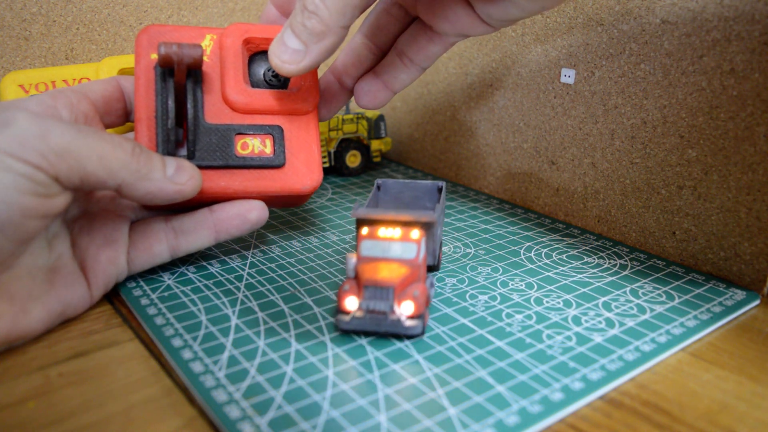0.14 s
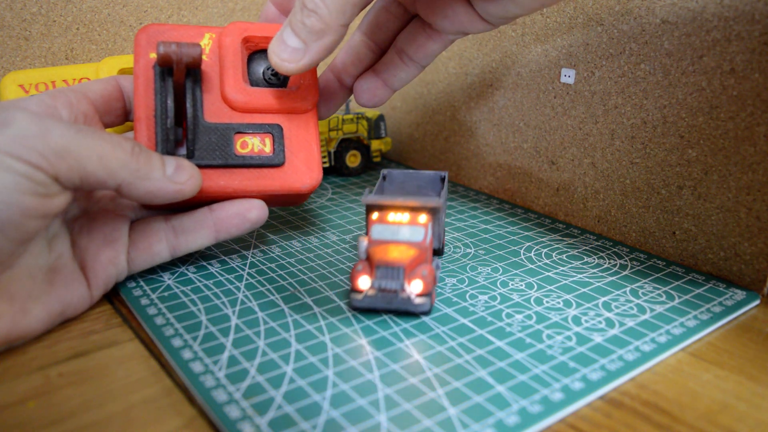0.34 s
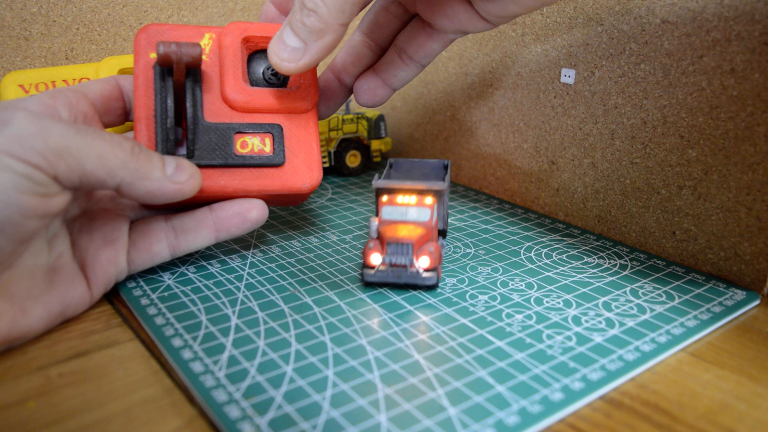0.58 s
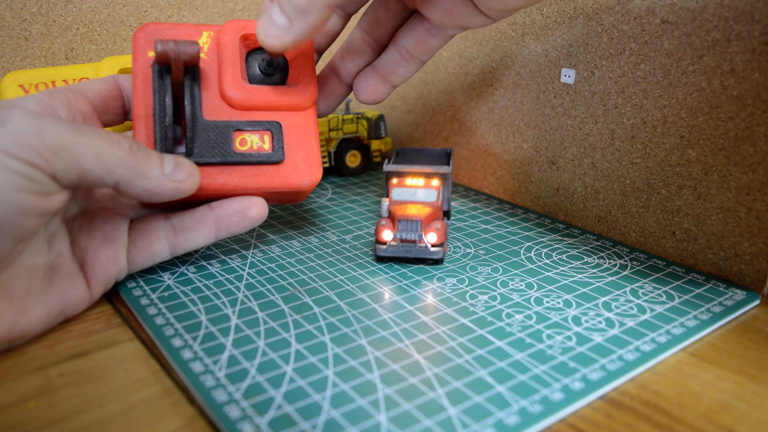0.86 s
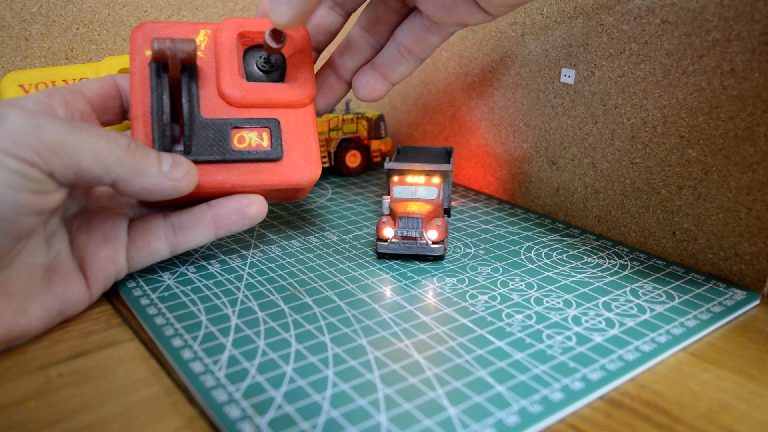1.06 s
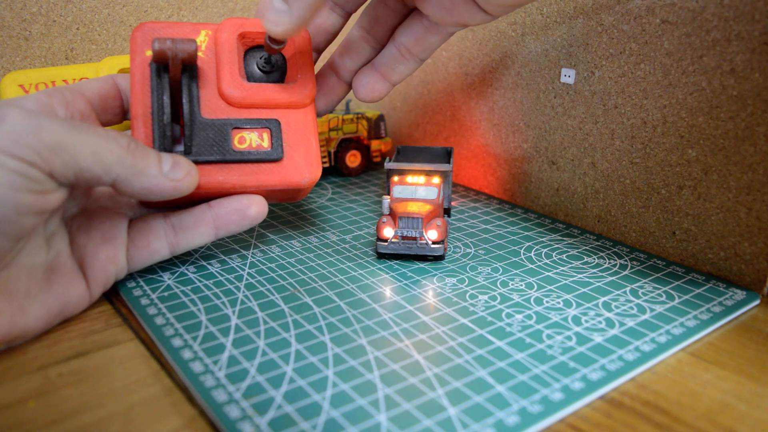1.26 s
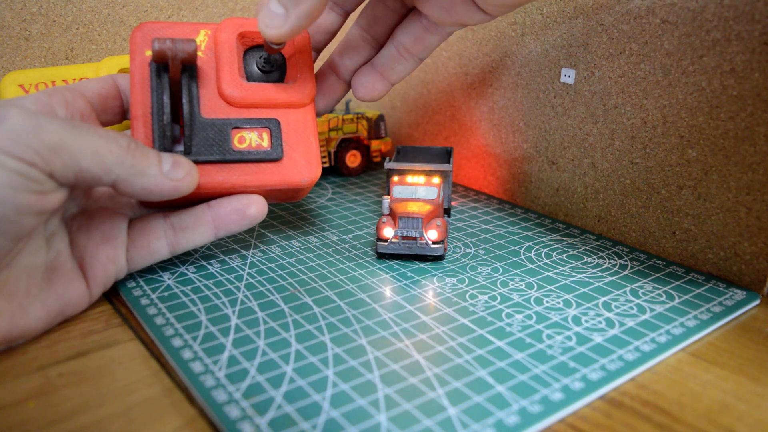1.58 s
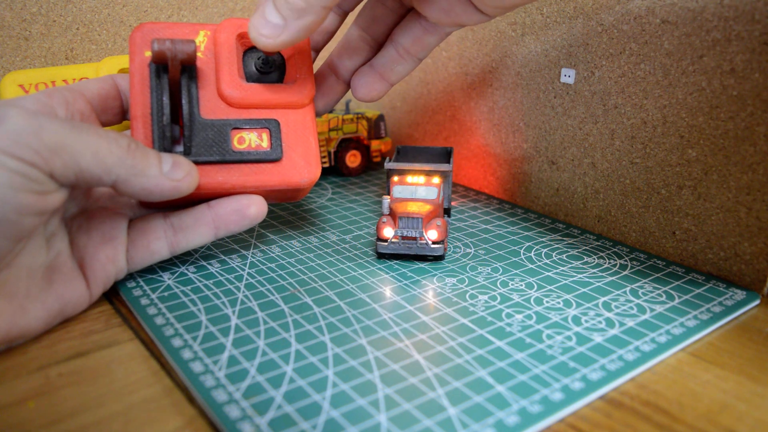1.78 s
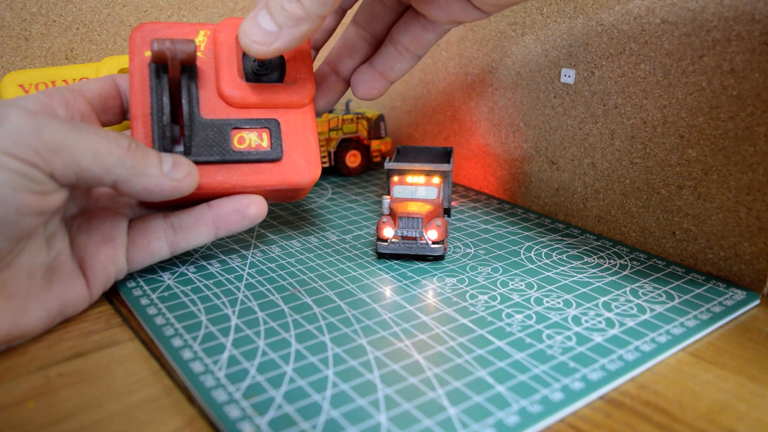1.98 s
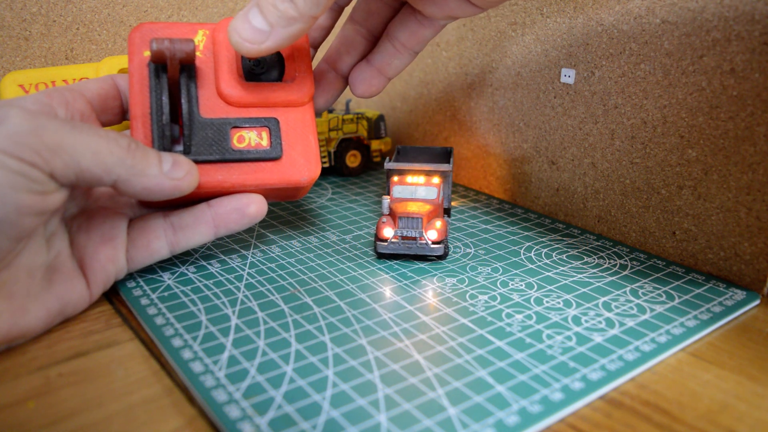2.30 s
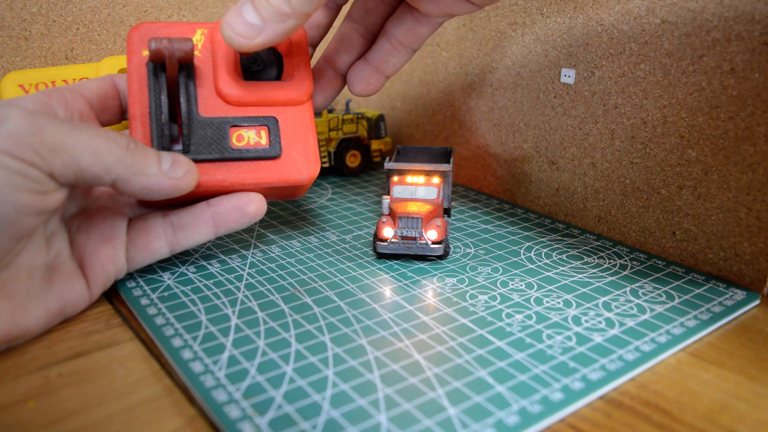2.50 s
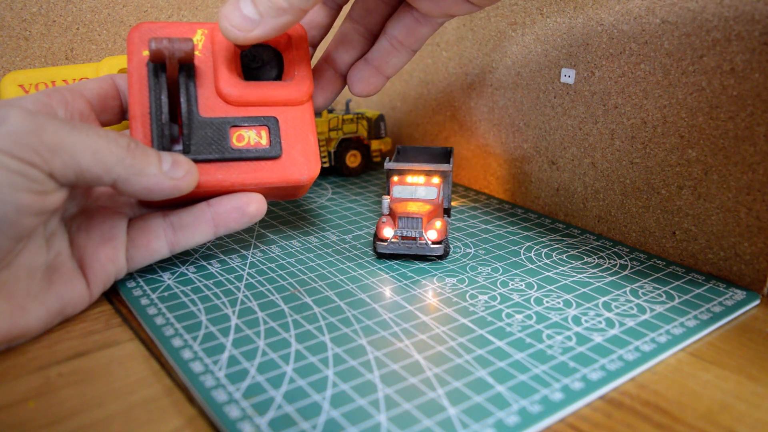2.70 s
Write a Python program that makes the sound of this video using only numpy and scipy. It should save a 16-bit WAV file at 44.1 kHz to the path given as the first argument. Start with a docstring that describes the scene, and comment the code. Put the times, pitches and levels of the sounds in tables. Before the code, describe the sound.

A tiny toy truck's motor and gears whirr, bright and hissy, surging unevenly with rattles and sharp ticks, slowing to a stop around 0.85-1 s. A finger faintly rubs a hollow plastic remote until 1.4 s, with soft low bumps to 1.5 s. A very faint high whistle glides by near 1.95 s. Rough gear buzzes burst at 2.1-2.45 s. Low, wavering fan hum and air continue throughout a small room.

```python
"""A small room with a fan humming throughout, one microphone: a miniature toy truck backs across a cutting mat.
Its tiny motor and gear teeth whirr, rattle and tick as they run down: uneven clicks and hiss through resonances.
A finger rubs the plastic remote, fine-grained clicks through a hollow case, and the hands bump softly.
A thin high whistle, a gliding sine, passes by; then the truck's small gears buzz in short, surging bursts.
The truck has a short, weak room tail; the hands sound dry; the fan is steady hum lines, a throb and moving air."""
import sys
import numpy as np
from scipy import signal
from scipy.fft import rfft, irfft, next_fast_len
from scipy.io import wavfile
from scipy.ndimage import map_coordinates

SR = 44100
rng = np.random.default_rng(int(sys.argv[2]) if len(sys.argv) > 2 else 0)


def persist_wave(psi):
    """Save psi, clipped to +-1, as 16-bit WAV."""
    counts = np.round(np.clip(psi, -1, 1) * 32767).astype(np.int16)
    wavfile.write(sys.argv[1], SR, np.atleast_2d(counts).T)


N = 125685
T = np.arange(N) / SR  # time of each sample, s

# In every COLOUR table the levels give a shape only: the filter is scaled to unit power.
# In every MODES table the width is taken at half the lift.

# Speed of the motor shaft: [t/s, rate/turns per s]
SHAFT_SPEED = [(0, 156), (.2, 158), (.3, 195), (.42, 207), (.5, 220), (.6, 180), (.68, 190), (.8, 224),
               (.86, 157), (.98, 70)]
# Level of the drive gears: [t/s, level/dB]
DRIVE_LEVEL = [(0, -50), (.11, -46.5), (.25, -47), (.36, -44), (.47, -43), (.55, -46.5), (.64, -46.5),
               (.75, -46.5), (.81, -45.5), (.87, -50), (.95, -57), (1.0, -68)]
# Swing of the load within a shaft turn: [multiple of the shaft rate, depth/dB before MESH_DEPTH]
MESH_SWINGS = [(1, 3), (2, 1.4), (3, 1.2), (4, 1.8), (5, 1.7), (10, 1.2)]
MESH_DEPTH, DRIVE_WAVER_DB = 0.77, 1.8  # factor on the swings; random waver of the load
# Scatter of the drive teeth in time and size; share of clicks in the power, the rest is hiss
TOOTH_JITTER_S, TOOTH_SCATTER_DB, TOOTH_SHARE = 0.00018, -1.5, 0.29
# Colour of the drive gears: [f/Hz, level/dB]
GEAR_COLOUR = [(1500, -37), (2400, -12), (3000, -7.5), (3700, -10), (4050, -8), (4400, -15), (5100, -5),
               (6000, -4), (7000, -4), (8500, -0.5), (9600, -3), (11000, -7.5), (12000, -12), (13000, -15),
               (15500, -27)]
# Resonances of the drive gears: [f/Hz, width/Hz, lift/dB]
GEAR_MODES = [(5940, 200, 1.5), (7850, 100, 7), (9500, 160, 7.5), (10100, 120, 3.5), (11750, 400, 4)]

# Level of the gearbox ringing at 6-8 kHz: [t/s, level/dB]
GEARBOX_LEVEL = [(0, -50), (.1, -63), (.17, -46.5), (.27, -51), (.35, -45.5), (.45, -46), (.53, -64),
                 (.64, -52), (.78, -51.5), (.86, -56)]
# Colour of the gearbox: [f/Hz, level/dB]
GEARBOX_COLOUR = [(4500, -37), (5300, -10), (6200, 0), (7000, 4), (7900, -5.5), (8600, -20), (11000, -39)]
# Resonances of the gearbox: [f/Hz, width/Hz, lift/dB]
GEARBOX_MODES = [(6070, 130, 13.5), (6430, 120, 13), (6870, 110, 13.5), (7100, 120, 12), (7550, 200, -11),
                 (7860, 130, -3)]
# Ring of the truck's shell: [t/s, f/Hz, level/dB]
SHELL_RING = [(0, 2940, -56), (.1, 2930, -53.5), (.22, 2980, -51.5), (.35, 2932, -62.5), (.5, 3122, -56.5),
              (.65, 3184, -60), (.75, 3250, -54), (.86, 3250, -84)]
SHELL_WIDTH_HZ = 175  # offset from the centre where the ring is down to half amplitude
# Colour of the wheels on the mat: [f/Hz, level/dB]
WHEEL_COLOUR = [(60, -14), (85, 3), (115, -9), (150, -14), (400, -33), (2000, -46)]
WHEEL_DB = -14.5  # against the gears

# Sharp rings of the gearbox: [f/Hz, width/Hz at half amplitude, level/dB against GEARBOX_LEVEL]
SHARP_RINGS = [(2890, 41, -14), (6760, 53, -17), (7760, 18, -8)]
# Faint top whine as the motor speeds up again: [t/s, f/Hz, level/dB]
TOP_WHINE = [(.66, 13500, -74), (.73, 13800, -63), (.8, 14250, -62), (.87, 14570, -70)]

# Gears catching and rattling: [t/s, length/s, level/dB]
RATTLES = [(.482, 0.01, -39.5), (0.548, 0.0044, -44), (0.574, 0.0048, -44), (0.673, 0.0065, -38),
           (.697, 0.01, -42.5), (0.717, 0.023, -41.5), (0.748, 0.0093, -38.5), (0.928, 0.019, -47.5)]
# Colour of the rattles: [f/Hz, level/dB]
RATTLE_COLOUR = [(1180, -52), (2000, -13), (3290, 0), (4480, -3.5), (5890, 4), (9110, 1), (10400, -1.5),
                 (11300, -10), (14000, -12), (15500, -19)]
# Backlash ticks, most of them as the gears run down: [t/s, level/dB]
BACKLASH_TICKS = [(.018, -39.5), (0.055, -35.5), (0.216, -34), (.444, -33), (.829, -35), (.835, -43),
                  (0.839, -36.5), (0.845, -33.5), (.852, -32.5), (0.8814, -38), (0.907, -38), (0.941, -43),
                  (.9745, -48)]
TICK_T60_S = 0.011
# Colour of the ticks: [f/Hz, level/dB]
TICK_COLOUR = [(2000, -21), (4500, -19), (6500, -9), (9300, 0), (11200, -3), (12500, -23), (15500, -24)]

# Gear buzzes: [t/s, length/s, level/dB, rate/surges per s]
BUZZES = [(2.094, 0.071, -34.5, 67), (2.176, 0.037, -33.5, 59), (2.215, 0.093, -34, 54.5),
          (2.375, 0.057, -35, 27)]
BUZZ_ATTACK_S, BUZZ_RELEASE_S = 0.0064, 0.023
BUZZ_SURGE_DB, SURGE_DELAY_S = 2.4, 0.0084  # swing either way; first crest after the start
BUZZ_TEETH_PER_S, BUZZ_CLICK_SHARE = 1100, 0.45
BUZZ_JITTER_S, BUZZ_SCATTER_DB = 0.00025, 1.5
# Colour of the buzzes: [f/Hz, level/dB]
BUZZ_COLOUR = [(1800, -42), (2400, -20.5), (2900, -9.5), (3600, -9.5), (4600, -19.5), (5500, -10),
               (6300, -12.5), (7000, -3), (7700, -5.5), (8800, -5), (9800, -1), (11400, -0.5),
               (12400, -14.5), (15500, -19)]
# Resonances in the buzzes: [f/Hz, width/Hz, lift/dB]
BUZZ_MODES = [(4135, 380, 11.5), (6850, 380, 5.5), (7550, 300, -4), (8220, 300, 6), (8600, 280, -1),
              (9240, 140, 4.5), (10300, 170, 0), (10860, 460, -4), (11040, 300, 7), (11700, 130, 1)]

# Finger sliding on plastic: [t/s, level/dB]
RUB_LEVEL = [(.93, -55), (1.02, -58.5), (1.08, -49.5), (1.15, -53), (1.22, -52), (1.32, -57), (1.38, -65)]
# Colour of the rub: [f/Hz, level/dB]
RUB_COLOUR = [(1470, -37), (2500, -10), (3750, -11), (4320, -2.5), (4800, -9.5), (5370, -2.5), (5790, -7),
              (6330, -6), (9490, 0), (12400, -16), (15000, -22)]
# Colour of the hollow remote: [f/Hz, level/dB]
CASE_COLOUR = [(120, -1.5), (300, -31), (400, -11), (480, 1.5), (560, -16), (1500, -28), (5000, -52)]
CASE_DB = -2  # against the rub
# Soft bumps of the hands: [t/s, f/Hz, level/dB, t60/s]
HAND_BUMPS = [(1.04, 70, -41.5, 0.1), (1.14, 42.4, -50, 0.3), (1.28, 91, -53, .2), (1.52, 34, -50.5, 0.14),
              (1.529, 75, -51, .12)]

# Low drone while the truck rolls: [t/s, level/dB]
DRONE_LEVEL = [(0, -61.5), (.1, -54), (.18, -84), (.28, -54), (.44, -53.5), (.52, -72), (.64, -56.5),
               (.8, -49), (.92, -56.5), (1.0, -69)]
DRONE_HZ = 109.3
# Thin whistle: [t/s, f/Hz, level/dB]
WHISTLE = [(1.7, 11400, -78), (1.77, 11850, -76), (1.83, 11400, -78), (1.88, 12200, -66),
           (1.92, 12680, -61), (1.965, 12800, -57), (2.0, 12250, -68), (2.04, 11200, -67),
           (2.09, 10900, -78)]

# Hum lines of the fan: [f/Hz, level/dB before waver and swell]
HUM_LINES = [(109, -72), (251.8, -57), (293.6, -51.5), (327, -63), (839.5, -70), (974, -67), (1174, -74.5),
             (2433, -75)]
HUM_WAVER_DB, HUM_DRIFT_RAD = 1.36, 0.52  # scale of the random level and phase curves
# Slow swell of all hum lines: [t/s, level change/dB]
HUM_SWELL = [(0, -2.5), (.2, -0.5), (.38, 1), (.65, -.5), (1.0, -2), (1.3, 0.5), (1.65, -1.5), (1.8, 1),
             (2.0, 2.5), (2.25, 0), (2.42, -0.5), (2.7, 2.5), (2.85, 0)]
# Level of the deepest hum, which wavers: [t/s, level/dB]
THROB_LEVEL = [(0, -57.5), (.42, -52), (.52, -69), (.72, -51), (.82, -68), (1.1, -60), (1.28, -56),
               (1.37, -47), (1.46, -50), (1.55, -63), (1.63, -49), (1.7, -65), (1.77, -49.5), (1.88, -56),
               (1.93, -66), (2.01, -52), (2.4, -57), (2.47, -59), (2.53, -59), (2.68, -50.5), (2.85, -55)]
THROB_HZ = 48.4
# Level of the fan's air: [t/s, level/dB]
AIR_LEVEL = [(0, -50.5), (.9, -50.5), (1.25, -50.5), (1.6, -51), (1.8, -50), (2.35, -50), (2.55, -51),
             (2.85, -51)]
# Colour of the fan's air: [f/Hz, level/dB]
AIR_COLOUR = [(20, -12), (45, -1), (75, -8.5), (110, -5), (150, -15), (200, -1.5), (270, 1), (370, -2.5),
              (480, -4), (720, -6), (980, -7.5), (1500, -10.5), (2500, -16), (4500, -20.5), (9200, -24),
              (11500, -24), (15500, -26.5)]
# Resonances in the air: [f/Hz, width/Hz, lift/dB]
AIR_MODES = [(185.3, 14, 2), (337, 4.8, -0.5), (373, 10.5, 5.5), (582, 34, -8), (760, 29, -6),
             (930, 38, 2.5), (10100, 550, 5.5)]

ROOM_T60_S, ROOM_DB = 0.21, -14  # decay of the tail; its level against the direct sound
TOP_HZ = 15800  # upper band limit


def amp(db):
    """Decibels to gain."""
    return 10 ** (np.asarray(db) / 20)


def unit(x):
    """Scale to rms 1."""
    return x / np.sqrt(np.mean(x ** 2) + 1e-20)


def noise():
    """White noise."""
    return rng.standard_normal(N)


def wobble(rate):
    """A smooth random curve, rate knots a second."""
    return map_coordinates(rng.standard_normal(4000), [T * rate + 2], mode="wrap")


def level(rows):
    """Gain from rows that start with t/s and end with level/dB; it fades outside the first and last row."""
    rows = np.array(rows)
    outside = np.maximum(rows[0, 0] - T, 0) + np.maximum(T - rows[-1, 0], 0)
    return amp(np.interp(T, rows[:, 0], rows[:, -1])) * np.exp(-outside / 0.022)


def turns(rows):
    """Cycles completed under a curve of t/s and f/Hz."""
    rows = np.array(rows)
    return np.cumsum(np.interp(T, rows[:, 0], rows[:, 1])) / SR


def sine(cycles, phase=0):
    """Sine of rms 1 with a wandering phase in radians."""
    return unit(np.sin(2 * np.pi * cycles + phase))


def filtered(x, response):
    """x times a response of frequency."""
    size = next_fast_len(N + 8192)  # zero padding keeps the end from wrapping to the start
    return irfft(rfft(x, size) * response(np.fft.rfftfreq(size, 1 / SR)), size)[:N]


def colour(x, points, modes=()):
    """Causal filter of unit power through f/Hz, level/dB points, lifted at each mode."""
    size = 8192
    f = np.fft.rfftfreq(size, 1 / SR)
    hz, db = np.transpose(points)
    shape = np.interp(np.log(f + 1), np.log(hz), db)
    shape = shape + 40 * np.log10(np.minimum((f + 1) / hz[0], 1))  # 12 dB/octave below the first point
    shape = shape + sum(lift / (1 + (2 * (f - c) / w) ** 2) for c, w, lift in modes)
    # folding the cepstrum gives minimum phase
    cepstrum = irfft(np.log(amp(shape) + 1e-6))
    cepstrum[1:size // 2] *= 2
    cepstrum[size // 2 + 1:] = 0
    impulse = irfft(np.exp(rfft(cepstrum)))
    return signal.fftconvolve(x, impulse / np.linalg.norm(impulse))[:N]


def teeth(cycles, jitter_s, scatter_db, share):
    """One click per cycle, uneven in time and size, mixed with sliding hiss; share is the clicks' power."""
    at = np.interp(np.arange(1, cycles[-1]), cycles, T)
    chance = rng.standard_normal((20000, 2))[:len(at)]
    at = (at + jitter_s * chance[:, 0]) * SR
    # windowed sinc pulses place each click between samples
    taps = np.floor(at)[:, None] + np.arange(-7, 9)
    offset = taps - at[:, None]
    clicks = np.sinc(offset) * np.cos(np.pi * offset / 16) ** 2
    clicks = clicks * amp(scatter_db * chance[:, 1:])
    index = np.clip(taps, 0, N - 1).astype(int)
    train = np.bincount(index.ravel(), clicks.ravel(), N)
    even = unit(train / np.sqrt(np.gradient(cycles)))  # equal power at any click rate
    share = np.clip(share, 0, 1)
    return np.sqrt(share) * even + np.sqrt(1 - share) * noise()


def gate(start, length, attack_s, release_s):
    """Rise, hold, then fall 60 dB over the release; attack lies within the length."""
    rise = np.clip((T - start) / attack_s, 0, 1)
    return rise * amp(-60 * np.maximum(T - start - length, 0) / release_s)


def drive(count=5):
    """Pinion teeth click count times a turn, swelling with the mesh; gearbox and shell ring, the wheels rumble."""
    shaft = turns(SHAFT_SPEED)
    swing_db = MESH_DEPTH * sum(db * np.cos(2 * np.pi * k * shaft) for k, db in MESH_SWINGS)
    load = unit(amp(swing_db + DRIVE_WAVER_DB * wobble(59.65)))
    contact = unit(load * teeth(count * shaft, TOOTH_JITTER_S, TOOTH_SCATTER_DB, TOOTH_SHARE))
    gears = colour(contact * level(DRIVE_LEVEL), GEAR_COLOUR, GEAR_MODES)
    gearbox = colour(load * noise() * level(GEARBOX_LEVEL), GEARBOX_COLOUR, GEARBOX_MODES)
    # slow noise shifted up to the gliding shell frequency
    ring = unit(filtered(noise(), lambda f: 1 / (1 + (f / SHELL_WIDTH_HZ) ** 2)))
    shell = unit(ring * np.cos(2 * np.pi * turns(SHELL_RING) + wobble(120)))
    wheels = amp(WHEEL_DB) * colour(noise(), WHEEL_COLOUR)
    return gears + gearbox + shell * level(SHELL_RING) + wheels * level(DRIVE_LEVEL)


def singing():
    """A few lightly damped parts of the gearbox keep ringing while it runs; a fuzzy whine rises on top."""
    def narrow(hz, width):
        return unit(filtered(noise(), lambda f: 1 / (1 + (2 * (f - hz) / width) ** 2)))

    fuzz = wobble(900) * np.cos(2 * np.pi * turns(TOP_WHINE) + wobble(500))
    whine = level(TOP_WHINE) * unit(fuzz)
    rings = sum(amp(db) * narrow(hz, width) for hz, width, db in SHARP_RINGS)
    return whine + level(GEARBOX_LEVEL) * rings


def rattles():
    """The gears catch for a few milliseconds as bursts of clicks, and tick across their backlash."""
    catch = sum(amp(db) * gate(s, length, 0.00069, 0.018) for s, length, db in RATTLES)
    chatter = catch * teeth(1500 * T, 0.000273, 2.7, 0.36)
    ticks = sum(amp(db) * gate(s, 0.0008, 0.0004, TICK_T60_S) for s, db in BACKLASH_TICKS)
    return colour(chatter, RATTLE_COLOUR) + colour(ticks * noise(), TICK_COLOUR)


def buzzes():
    """Short runs of fast, rough gear chatter that surge at a steady beat."""
    effort = 0
    for start, length, db, rate in BUZZES:
        surge_db = BUZZ_SURGE_DB * np.cos(2 * np.pi * rate * (T - start - SURGE_DELAY_S))
        effort = effort + gate(start, length, BUZZ_ATTACK_S, BUZZ_RELEASE_S) * amp(db + surge_db)
    chatter = teeth(BUZZ_TEETH_PER_S * T, BUZZ_JITTER_S, BUZZ_SCATTER_DB, BUZZ_CLICK_SHARE)
    return colour(effort * chatter, BUZZ_COLOUR, BUZZ_MODES)


def hands():
    """A finger slides over the fine-grained, hollow remote; the hands bump softly as decaying low sines."""
    slide = level(RUB_LEVEL) * teeth(2500 * T, 0.00041, 3.4, 0.43)
    rub = colour(slide, RUB_COLOUR) + amp(CASE_DB) * colour(slide, CASE_COLOUR)
    bumps = sum(amp(db) * gate(s, 0.015, 0.012, t60) * np.sin(2 * np.pi * hz * (T - s))
                for s, hz, db, t60 in HAND_BUMPS)
    return rub + bumps


def tones():
    """The low drone of the rolling truck and the thin gliding whistle, sines of unsteady phase."""
    drone = level(DRONE_LEVEL) * sine(DRONE_HZ * T, 0.5 * wobble(15.7))
    whistle = level(WHISTLE) * sine(turns(WHISTLE), 0.6 * wobble(250))
    return drone + whistle


def fan():
    """Slightly unsteady hum lines and a deep throb over moving air, which is coloured noise."""
    lines = sum(amp(db + HUM_WAVER_DB * wobble(5.81)) * sine(hz * T, HUM_DRIFT_RAD * wobble(4.74))
                for hz, db in HUM_LINES)
    throb = level(THROB_LEVEL) * sine(THROB_HZ * T, 0.56 * wobble(4.1))
    air = level(AIR_LEVEL) * colour(noise(), AIR_COLOUR, AIR_MODES)
    return level(HUM_SWELL) * lines + throb + air


def room(x):
    """A short, weak tail from the near walls: exponentially decaying noise."""
    t = T[:SR // 2]
    tail = rng.standard_normal(len(t)) * amp(-60 * t / ROOM_T60_S)
    return x + amp(ROOM_DB) * signal.fftconvolve(x, tail / np.linalg.norm(tail))[:N]


def scene():
    """Truck and hands in the humming room, one channel."""
    truck = room(drive() + singing() + rattles() + buzzes())
    return (truck + hands() + tones() + fan())[None]


def record(dry):
    """The microphone channel keeps nothing above its band limit."""
    return np.array([filtered(x, lambda f: f < TOP_HZ) for x in dry])


dry = scene()
out = record(dry)
persist_wave(out)
```